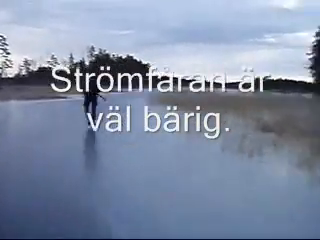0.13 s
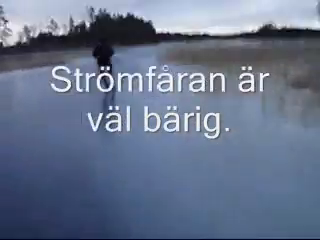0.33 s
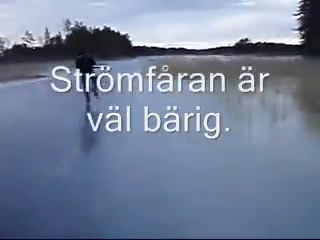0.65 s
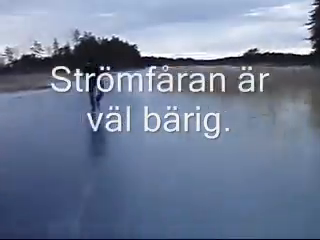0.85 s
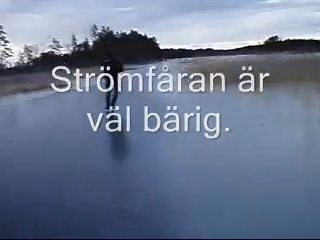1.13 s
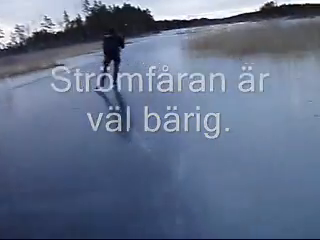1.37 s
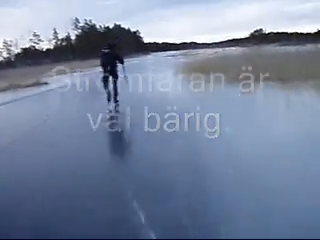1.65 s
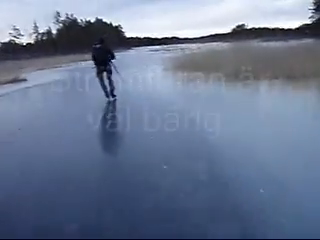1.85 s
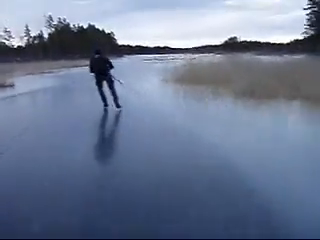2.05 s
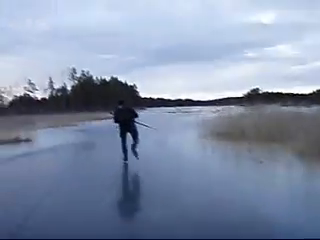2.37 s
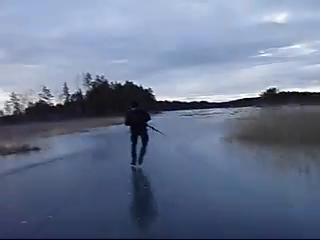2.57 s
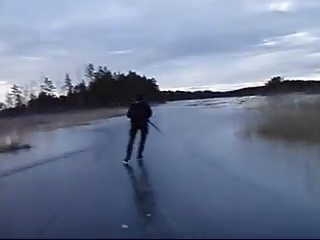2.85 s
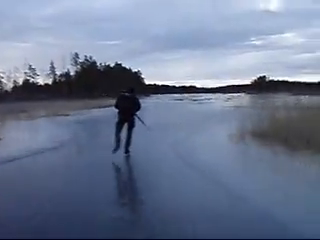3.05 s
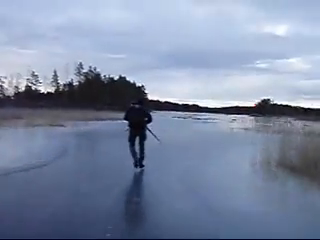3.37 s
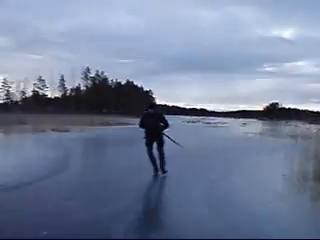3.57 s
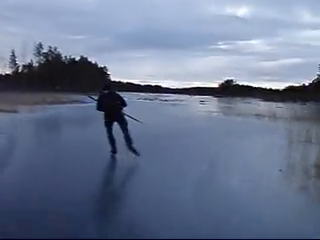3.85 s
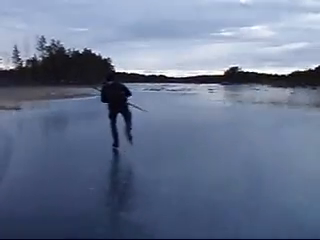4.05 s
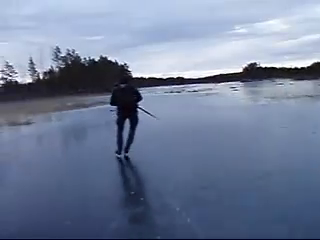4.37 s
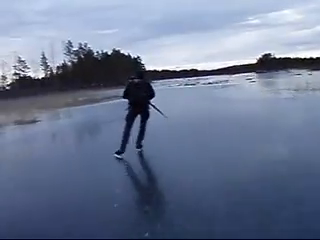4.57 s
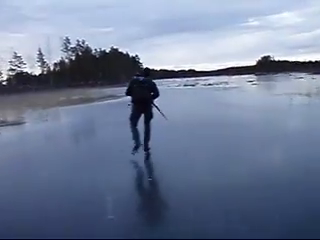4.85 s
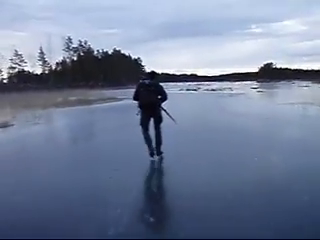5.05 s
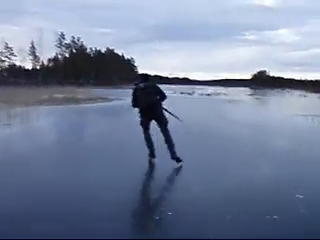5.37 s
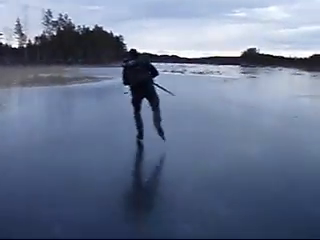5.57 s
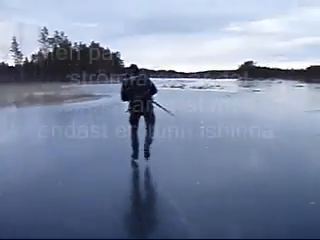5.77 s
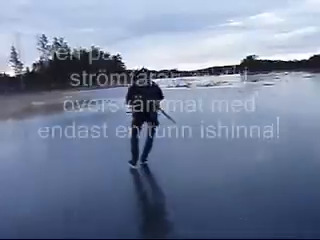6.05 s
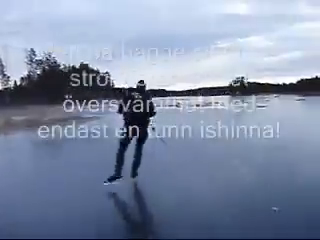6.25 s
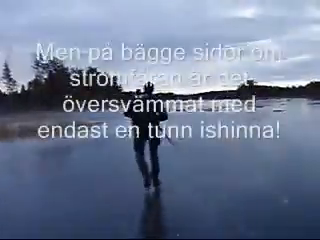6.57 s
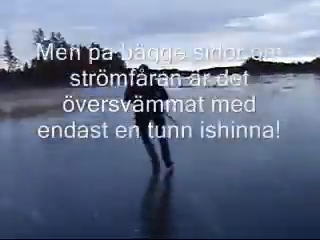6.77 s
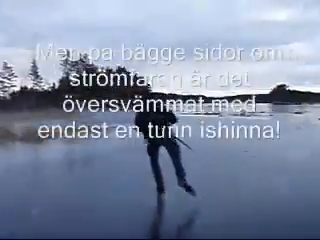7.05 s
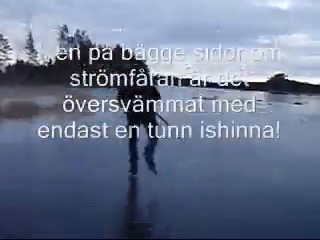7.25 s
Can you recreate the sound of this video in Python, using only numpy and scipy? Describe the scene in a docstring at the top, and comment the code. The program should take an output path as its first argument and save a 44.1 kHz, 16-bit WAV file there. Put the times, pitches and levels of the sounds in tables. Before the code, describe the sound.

Long skate blades hiss and scrape over lake ice in steady strokes, with clacks, crackling chips and short chirping knocks.

```python
"""Long skates on clear lake ice

Out on the open ice, heard from a camera carried by the skater behind. The blades hiss as they glide,
swell at each push-off and sing faintly; one that is set down clacks and crunches, falling in pitch
as it takes the weight. Chips snap off the edge and bumps send short bending-wave chirps through
the ice. Air rumbles faintly on the microphone, which overloads on the peaks."""
import sys
import numpy as np
from scipy import signal
from scipy.fft import rfft, irfft
from scipy.io import wavfile

SR = 44100
rng = np.random.default_rng(int(sys.argv[2]) if len(sys.argv) > 2 else 0)


def digitize_waveform(pressure):
    """Quantize a signal to 16-bit integers and store it at the path in sys.argv[1].

    Rows of a 2-D input are taken as channels; values are limited to [-1, 1].
    """
    field = np.atleast_2d(pressure).T
    bounded = np.clip(field, -1, 1)
    quanta = np.round(bounded * 32767).astype(np.int16)
    wavfile.write(sys.argv[1], SR, quanta)


N = 326823
TIME = np.arange(0, N + 32, 32) / SR  # coarse clock for the envelopes, in seconds


def from_db(db):
    """Decibels to gain."""
    return 10 ** (np.asarray(db) / 20)


def rms_one(x):
    """Scale to an rms of 1."""
    return x / np.sqrt(np.mean(x ** 2) + 1e-20)


def drift(rate):
    """Smooth random wander with about `rate` turns a second; rms 1."""
    step, settle = 40, 2000
    pole = np.exp(-2 * np.pi * rate * step / SR)
    noise = rng.standard_normal(N // step + settle + 2)
    slow = signal.lfilter([1], [1, -2 * pole, pole * pole], noise)[settle:]
    return np.interp(np.arange(N) / step, np.arange(len(slow)), rms_one(slow))


def coloured(x, colour, size=4096):
    """Minimum-phase filter with a spectrum given as (Hz, dB) points; rms 1."""
    hz, db = np.transpose(colour)
    bins_hz = np.linspace(1, SR / 2, size // 2 + 1)
    log_gain = np.log(from_db(np.interp(np.log(bins_hz), np.log(hz), db)))
    cepstrum = irfft(log_gain)[:size // 2]
    causal = np.r_[cepstrum[0], 2 * cepstrum[1:]]
    response = irfft(np.exp(rfft(causal, size)))
    return rms_one(signal.fftconvolve(x, response)[:N])


def resonate(x, hz, width_hz):
    """A steady resonance with gain 1 at its peak."""
    r = np.exp(-np.pi * width_hz / SR)
    feedback = [1, -2 * r * np.cos(2 * np.pi * hz / SR), r * r]
    return signal.lfilter(np.array([1, 0, -1]) * (1 - r * r) / 2, feedback, x)


def sweep(x, hz, width_hz):
    """A resonance whose centre follows the curve hz."""
    turn = np.exp(2j * np.pi * np.cumsum(hz) / SR)
    r = np.exp(-np.pi * width_hz / SR)
    return (signal.lfilter([1 - r], [1, -r], x / turn) * turn).real


def add(track, s, sound):
    """Mix a short sound into a track at time s."""
    start = int(np.clip(s * SR, 0, N - 1))
    track[start:start + len(sound)] += sound[:N - start]


def swell(s, rise_s, fall_s):
    """A rounded peak at time s with exponential flanks."""
    from_peak = (TIME - s) / np.where(TIME < s, rise_s, fall_s)
    return 1 / np.cosh(np.clip(from_peak * np.pi / 2, -40, 40))


def held(s, length_s, attack_s, release_s, fade_db_per_s=0):
    """Attack, a hold that may fade, release."""
    age = np.maximum(TIME - s, 0)
    release = np.exp(-np.maximum(age - length_s, 0) / release_s)
    return np.minimum(age / attack_s, 1) * from_db(-fade_db_per_s * age) * release


def together(envelopes):
    """Add coarse envelopes in power and spread the sum over the samples."""
    power = sum(envelope ** 2 for envelope in envelopes)
    return np.interp(np.arange(N) / SR, TIME, np.sqrt(power + 1e-18))


def fractures(per_s, spread_db, decay_s):
    """Envelope of tiny fractures: random starts, uneven sizes, each dying fast; rms 1."""
    sizes = from_db(spread_db * np.minimum(rng.exponential(1, N), 3))
    born = rng.random(N) < per_s / SR
    power = signal.lfilter([1], [1, -np.exp(-2 / (decay_s * SR))], born * sizes ** 2 + 1e-18)
    return rms_one(np.sqrt(power))


def gritty(grain_db):
    """Noise whose strength jumps from one ice grain to the next."""
    return rms_one(rng.standard_normal(N) * from_db(grain_db * drift(500)))


def through_blade(x, trip_s=0.00172, wander=0.055, reflected=0.33):
    """The steel sheds the lows and echoes twice; a shifting contact moves the squeaky overtones."""
    highs = signal.sosfilt(signal.butter(4, 980, "high", fs=SR, output="sos"), x)
    now = np.arange(N)
    earlier = now - trip_s * SR * (1 + wander * drift(11))
    once = np.interp(earlier, now, highs)
    twice = np.interp(earlier, now, once)
    return rms_one(highs + reflected * once + reflected ** 2 * twice)


# Strokes ahead of the microphone. Each row: start in seconds, level in dB, length in seconds.
GLIDES = [(0.043, -21.5, 0.19), (0.572, -27, 0.12), (1.976, -30, 0.23), (2.536, -26.5, 0.15),
          (3.082, -27.5, 0.14), (3.497, -19.5, 0.18), (3.791, -19.5, 0.13), (5.048, -24, 0.55),
          (6.216, -25.5, 0.22), (6.703, -25.5, 0.54)]
# The unbroken hiss under the strokes. Each row: time in seconds, relative level in dB.
COASTING = [(0.0, -28), (0.45, -27.5), (0.7, -28.5), (1.24, -31), (1.8, -27), (2.16, -25), (2.37, -27),
            (3.51, -28), (3.73, -26), (4.19, -28), (5.03, -26), (5.39, -21), (5.78, -31), (6.55, -25.5),
            (6.685, -31.5), (6.74, -26), (7.02, -19), (7.41, -34)]


def gliding():
    """Envelope of blade friction: it rises as a skate is set down and fades through the stroke."""
    strokes = [from_db(db) * held(s, length, attack_s=0.026, release_s=0.047, fade_db_per_s=11.5)
               for s, db, length in GLIDES]
    coasting = from_db(np.interp(TIME, *np.transpose(COASTING)) - 2)
    return together(strokes + [coasting])


# Tone of a gliding and of a pushing edge. Each row: frequency in Hz, relative level in dB.
GLIDE_COLOUR = [(150, -5.5), (400, -4.5), (800, -8.5), (1500, -5.5), (2500, -3.5), (3300, -0.5),
                (4500, -1.5), (5600, -10.5), (7000, -17.5), (9500, -18), (12000, -12)]
PUSH_COLOUR = [(200, -14), (800, -12), (1500, -21), (2100, -3.5), (2500, -9), (3100, 1), (4000, -0.5),
               (4900, -3), (5700, -16.5), (7000, -18), (9500, -19.5), (12000, -11)]
# Brief skids of the edge. Each row: start in seconds, level in dB, length in seconds.
SKIDS = [(0.164, -19, 0.025), (0.269, -25, 0.035), (0.346, -21.5, 0.018), (0.511, -18.5, 0.041),
         (0.711, -27, 0.052), (0.922, -22, 0.05), (1.88, -24, .07), (3.3, -20, 0.012), (4.014, -19, 0.029),
         (4.544, -22, 0.023), (5.212, -11, 0.021), (5.678, -22, 0.013), (6.477, -20.5, 0.05),
         (6.57, -25.5, 0.058), (6.701, -12.5, 0.017), (6.832, -17, .02), (6.921, -18, 0.046),
         (7.369, -22, 0.048)]
# The skater ahead pushes off, a strong foot and a weak foot in turn.
# Each row: time of the peak in seconds, level in dB, rise and fall in seconds.
PUSHES = [(0.592, -13.5, 0.016, 0.02), (1.495, -13.5, 0.037, 0.045), (2.23, -22, 0.062, 0.034),
          (3.002, -10, 0.027, 0.058), (3.91, -15.5, 0.025, 0.016), (4.72, -9.5, 0.054, 0.045),
          (5.42, -19, 0.042, 0.11), (6.315, -8, 0.053, 0.062), (7.055, -12, 0.047, 0.084)]


def edge_hiss(friction):
    """A gliding edge crackles; under pressure it shaves the ice in a denser, narrower hiss."""
    pushing = together(from_db(db) * swell(s, rise, fall) for s, db, rise, fall in PUSHES)
    skidding = together(from_db(db) * held(s, length, attack_s=0.0062, release_s=0.0092)
                        for s, db, length in SKIDS)
    level = np.sqrt(friction ** 2 + skidding ** 2 + pushing ** 2)
    shaving = 1 / (1 + (from_db(-19) / level) ** 5.8)  # share of the narrow hiss
    crackle = np.hypot(0.8, fractures(per_s=120, spread_db=2.5, decay_s=0.0026))
    glide = from_db(1.27) * coloured(gritty(grain_db=1) * crackle, GLIDE_COLOUR)
    push = from_db(-0.67) * coloured(gritty(grain_db=3) * from_db(1.7 * drift(150)), PUSH_COLOUR)
    return level * (np.sqrt(1 - shaving) * glide + np.sqrt(shaving) * push)


# A blade takes weight and bites into the lake's surface.
# Each row: start in seconds, level in dB, length in seconds, starting pitch in Hz.
BITES = [(0.0, -22.5, 0.15, 1830), (0.112, -20.5, 0.018, 1300), (0.216, -18, 0.014, 2100),
         (0.522, -25.5, 0.015, 1540), (0.921, -19.5, 0.049, 1560), (1.056, -19.5, 0.021, 1910),
         (1.754, -21, 0.025, 1680), (1.823, -16.5, 0.011, 1260), (1.935, -17.5, 0.027, 1820),
         (2.567, -19.5, 0.068, 1650), (2.721, -25, 0.059, 1670), (3.486, -23, 0.15, 1660),
         (3.795, -20.5, 0.15, 1640), (4.035, -20, 0.015, 1350), (4.367, -18, 0.041, 1810),
         (4.539, -19, 0.032, 1510), (4.648, -30.5, 0.13, 1200), (4.877, -33, 0.063, 1200),
         (5.308, -23.5, 0.059, 1950), (5.396, -18.5, 0.043, 1900), (5.484, -27.5, 0.1, 1680),
         (6.347, -21, 0.081, 1920), (6.704, -28, 0.041, 2400), (6.902, -22, 0.07, 1810),
         (7.052, -18.5, 0.09, 1890), (7.329, -22.5, 0.086, 1790)]


def crushing(friction, sag_octaves_per_s=6, loaded_hz=1140, grind_hz=1410):
    """Strength and pitch of the crunch: the strongest contact leads, sinking as the weight comes on."""
    bites = [from_db(db) * held(s, length, attack_s=0.004, release_s=0.012, fade_db_per_s=34)
             for s, db, length, _ in BITES]
    pitches = [np.maximum(hz * 2 ** (-sag_octaves_per_s * np.maximum(TIME - s, 0)), loaded_hz)
               for s, _, _, hz in BITES]
    grind = from_db(-9) * friction  # light crushing under a gliding blade
    strength = np.hypot(together(bites), grind)
    weighted_pitch = together(bite * hz for bite, hz in zip(bites, pitches))
    return strength, np.hypot(weighted_pitch, grind * grind_hz) / strength


# Tone of crushed ice. Each row: frequency in Hz, relative level in dB.
CRUNCH_COLOUR = [(120, -6), (350, 4), (750, -1.5), (1150, 0.5), (2300, -1), (2800, -3.5), (4200, -14.5),
                 (5200, -8.5), (6400, -8), (7400, -24.5), (10000, -11.5), (12000, -18.5)]


def crunch(strength, centre_hz):
    """The surface gives way in fine slips: a thin pitched rasp at first, more body once loaded."""
    slips = np.hypot(0.3, fractures(per_s=220, spread_db=2.5, decay_s=0.0024))
    crushed = coloured(gritty(grain_db=0.7) * slips, CRUNCH_COLOUR)
    thin = through_blade(crushed)
    loaded = np.clip((1650 - centre_hz) / 400, 0.1, 1)
    body = signal.sosfilt(signal.butter(4, 1000, fs=SR, output="sos"), crushed) * loaded
    rasp = rms_one(sweep(thin, centre_hz * (1 + 0.1 * drift(28)), width_hz=96))
    return strength * (from_db(-2) * thin + from_db(3) * body + from_db(-5) * rasp)


# Tone of air right on the microphone. Each row: frequency in Hz, relative level in dB.
WIND_COLOUR = [(20, -34), (45, 0), (80, -5), (150, 0.5), (300, -8), (700, -43), (2000, -35)]
# Gusts on the microphone. Each row: start in seconds, level in dB, length in seconds.
GUSTS = [(2.071, -24.5, .08), (2.31, -33, 0.064)]


def wind(start_db=-39.5, end_db=-43):
    """Carried through the air, the microphone picks up a lumpy rumble that eases along the way."""
    steady = from_db(np.linspace(start_db, end_db, len(TIME)))
    gusts = [from_db(db) * held(s, length, attack_s=0.012, release_s=0.033) for s, db, length in GUSTS]
    lumps = from_db(4 * drift(8.8))
    return together(gusts + [steady]) * lumps * coloured(rng.standard_normal(N), WIND_COLOUR)


def ice_chirp(hz, rebound_s, octaves, rebound_db, delay_cycles=0.749, size=1024):
    """High bending waves outrun low ones, so a blow arrives as a falling chirp with a duller rebound."""
    f = np.linspace(1, SR / 2, size // 2 + 1)
    band = 1 / np.sqrt(1 + (np.log2(f / hz) / octaves) ** 6)
    dispersion = np.exp(-4j * np.pi * delay_cycles * np.sqrt(f / hz))
    rebound = from_db(rebound_db) * np.exp(-2j * np.pi * f * rebound_s) / (1 + 1j * f / hz)
    wave = irfft(band * dispersion * (1 + rebound))
    return wave / np.abs(wave).max()


def plop(pitch, middle_hz=322, spread_octaves=0.78):
    """A shallow bump bends the ice without jarring the skate: a round, low chirp; pitch runs 0-1."""
    hz = middle_hz * 2 ** (spread_octaves * (pitch - 0.5))
    return ice_chirp(hz, rebound_s=0.0026, octaves=0.71, rebound_db=-11.5)


# Shallow bumps in the lake ice. Each row: start in seconds, relative peak level in dB.
PLOPS = [(0.299, -15), (0.377, -17), (1.173, -12), (1.55, -17), (1.842, -13), (1.887, -13), (2.011, -15),
         (2.65, -11.5), (2.795, -17.5), (3.14, -13.5), (3.565, -9.5), (4.259, -14.5), (4.826, -7.5),
         (5.13, -14), (5.647, -17), (5.866, -12), (6.024, -12), (6.525, -6), (6.735, -18), (6.769, -16),
         (6.828, -13), (7.213, -15), (7.238, -16.5), (7.259, -16), (7.283, -15.5)]


def ripples(strength, patter_count=110):
    """Uneven ice under the blades: clear plops over a steady soft patter, stronger under load."""
    out = np.zeros(N)
    for (s, db), pitch in zip(PLOPS, rng.random(len(PLOPS))):
        add(out, s, from_db(db - 1.1) * plop(pitch))
    load = np.maximum(strength / from_db(-30), 1)
    for slot, (offset, size, pitch) in enumerate(rng.random((patter_count, 3))):
        at = int((slot + offset) / patter_count * N)
        add(out, at / SR, from_db(-31 + 5.2 * size ** 2) * load[at] ** 0.12 * plop(pitch))
    return out


# A blade sings on its edge. Each row: start in seconds, level in dB, length in seconds.
SONGS = [(0.08, -39, 0.31), (2.106, -40, 0.32), (5.096, -37, 0.2), (6.697, -29.5, .18)]


def blade_song(hz=1135, width_hz=66, floor_db=-51.5):
    """Friction keeps one narrow mode of the steel ringing, now and then more strongly."""
    songs = [from_db(db) * held(s, length, attack_s=0.015, release_s=0.02) for s, db, length in SONGS]
    mode = resonate(resonate(rng.standard_normal(N), hz, width_hz), hz, width_hz)
    return together(songs + [from_db(floor_db)]) * rms_one(mode)


# Hard bumps in the skater's path. Each row: start in seconds, relative level in dB,
# nominal pitch in Hz (the chirp is centred lower).
KNOCKS = [(0.092, -21, 1020), (0.12, -18, 550), (0.174, 0, 990), (1.826, -12, 1260), (1.86, -9, 1030),
          (1.923, -4, 1120), (2.675, -15, 670), (2.706, -13, 443), (2.845, -11, 900), (3.183, -5, 716),
          (3.206, -12, 655), (3.699, -14, 745), (3.724, -14, 1240), (3.737, -3, 960), (3.776, -4, 1260),
          (3.878, -6.5, 1030), (3.948, -9.5, 714), (3.981, -12.5, 535), (4.027, -18, 800),
          (4.095, -6.5, 920), (4.22, -16, 686), (4.309, -12.5, 730), (4.415, -11, 806), (4.4751, -1.5, 770),
          (4.526, -7.5, 784), (4.565, -7, 630), (4.631, -3, 770), (4.673, -6.5, 610), (4.738, -8, 830),
          (4.774, -12, 656), (4.793, -14.5, 860), (4.871, -9.5, 1080), (4.891, -8.5, 1100),
          (4.921, -15, 960), (4.952, -7, 800), (5.016, -17.5, 874), (5.054, -9, 730), (5.097, -3, 665),
          (5.469, 1, 1070), (5.694, -16, 615), (5.736, -11.5, 850), (5.821, -16, 820), (5.844, -8, 1080),
          (5.893, -20, 660), (5.935, -15.5, 690), (5.998, -17, 680), (6.157, -19.5, 525), (6.238, -16, 725),
          (6.49, -12, 590), (7.121, -11.5, 750)]


def knocks():
    """A blade strikes a bump: the ice chirps, the skate comes down again and the binding rattles."""
    chirps, rattle = np.zeros(N), np.zeros(N)
    t = np.arange(int(0.03 * SR)) / SR
    for (s, db, hz), late in zip(KNOCKS, rng.random(len(KNOCKS))):
        octaves = max(1.77 + 0.17 * db, 0.5)  # half bandwidth: softer bumps are rounder
        chirp = ice_chirp(0.73 * hz, rebound_s=0.00179 + 0.0014 * late, octaves=octaves, rebound_db=-6.5)
        add(chirps, s, from_db(db + 7.5) * chirp)
        add(rattle, s, from_db(db - 0.5) * np.exp(-t / 0.0027))
    skate_ring = from_db(-5.5) * resonate(chirps, hz=1240, width_hz=170)
    skate_ring += from_db(-10) * resonate(chirps, hz=890, width_hz=220)
    low_middle = from_db(-11.5) * resonate(chirps, hz=610, width_hz=260)  # cut for a dry knock
    return chirps + skate_ring - low_middle + rattle * coloured(rng.standard_normal(N), CRUNCH_COLOUR)


# Ice chips snap off at the edge. Each row: time in seconds, relative tick and crunch levels in dB.
CHIPS = [(0.095, -1.5, -13), (0.221, -11, -23), (0.463, 6, -17), (0.499, -17, -21), (0.654, -7, -19),
         (0.731, -10, -29), (0.738, -4.5, -38), (0.884, -3, -12), (1.351, -13.5, -25), (1.739, -6.5, -11),
         (1.826, -16, -9.5), (1.842, -7.5, -12), (1.921, -30, -9), (1.998, -9, -21), (2.007, -7.5, -18.5),
         (2.075, 0.5, -26), (2.091, -11, -27), (2.1, -6, -16), (2.357, -12.5, -22), (3.513, -6, -10.5),
         (3.604, 1.5, -21), (3.7227, -22, -10), (3.742, -3.5, -9), (3.773, -6, -8), (3.779, 3, -10),
         (3.833, -19, -7.5), (3.947, 5.5, -10), (3.98, -23, -13), (4.055, -21, -11.5), (4.077, -12.5, -22),
         (4.095, -16, -17), (4.241, -12, -15), (4.258, -13, -15.5), (4.287, -13, -16), (4.478, -6, -25),
         (4.526, -4, -17), (4.63, -9, -13), (4.873, -2.5, -9), (4.896, -7, -10), (4.9, -4, -14),
         (4.953, -8, -16), (5.054, -5.5, -7), (5.084, -9, -17), (5.204, -9, -18), (5.271, -2.5, -12.5),
         (5.298, -12, -20), (5.339, -2.5, -9), (5.396, -4, -25), (5.422, 3, -10), (5.472, -3.5, -17),
         (5.544, -12, -21), (5.633, -4.5, -17), (5.737, -15, -15), (5.847, -20, -16.5), (6.024, -12, -16),
         (6.143, -5.5, -19), (6.193, -10.5, -19), (6.6972, -10, -13), (6.716, -9, -22), (6.76, -12, -17),
         (6.804, -10, -17), (6.814, -6, -16), (6.832, -7.5, -17), (6.88, -21, -18), (6.93, -8, -12),
         (6.961, -1, -4.5), (7.251, -14, -23), (7.305, -6, -16.5), (7.325, -13, -18), (7.362, -10.5, -16)]


def chips(attack_s=0.00058, tear_s=0.0036, chatter_hz=3975, wander=0.064):
    """A chip tears off in milliseconds: the edge chatters in a metallic tick, over a little crunch."""
    tick_level, crunch_level = np.zeros(N), np.zeros(N)
    t = np.arange(int(4 * tear_s * SR)) / SR
    burst = np.minimum(t / attack_s, 1) * np.exp(-(t / tear_s) ** 2)
    for s, tick_db, crunch_db in CHIPS:
        add(tick_level, s - attack_s, from_db(tick_db) * burst)
        add(crunch_level, s - attack_s, from_db(crunch_db) * burst)
    phase = 2 * np.pi * np.cumsum(chatter_hz * (1 + wander * drift(300))) / SR
    chatter = rms_one(np.sin(phase) + from_db(-19) * np.sin(2 * phase))
    tick = rms_one(chatter + from_db(1) * coloured(gritty(grain_db=3), PUSH_COLOUR))
    crushed = through_blade(coloured(gritty(grain_db=0.5), CRUNCH_COLOUR))
    return from_db(-6) * tick_level * tick + from_db(1.1) * crunch_level * crushed


# Modes of the struck steel. Each row: frequency in Hz, level in dB, seconds to die away by 60 dB.
BLADE_MODES = [(1200, -3.5, 0.017), (1730, -4.5, 0.0095), (2330, -5.5, .012), (4050, 7, 0.011)]
# Blades land ahead of the microphone. Each row: start in seconds, level in dB, contact pitch in Hz.
CLACKS = [(0.132, -2, 1300), (0.54, -5, 2100), (0.908, -8, 2200), (0.9189, 0, 1750), (1.056, -9, 1600),
          (1.083, -7, 1760), (2.536, -4, 1150), (2.563, 1.5, 1720), (2.592, -9, 1600), (2.652, -4.5, 1310),
          (2.815, -12, 1190), (3.485, -3.5, 1650), (3.498, -6, 1520), (4.3393, -0.5, 1710),
          (4.3624, 0.5, 1600), (4.379, -0.5, 1970), (4.399, -9, 1300), (4.65, -6, 1100), (4.9139, 0, 1390),
          (4.937, -7, 1500), (5.315, -4.5, 1800), (5.349, -4.5, 1780), (6.6965, -8, 2400),
          (7.074, -5, 1400), (7.348, -10, 1820)]


def clacks(falloff_db_per_octave=18, detune=0.065, grit_db=-9.5, grit_s=0.0049):
    """A blade slaps the ice and rings, favouring modes near the pitch of the contact; grit follows."""
    steel, grit = np.zeros(N), np.zeros(N)
    t = np.arange(int(0.04 * SR)) / SR
    hz, mode_db, t60 = np.transpose(BLADE_MODES)
    decays = from_db(-60 * t / t60[:, None])
    signs = (-1) ** np.arange(len(hz))
    for s, db, contact_hz in CLACKS:
        level_scatter, pitch_scatter = rng.standard_normal((2, len(hz)))
        octaves_away = np.abs(np.log2(hz / contact_hz))
        gains = from_db(mode_db - falloff_db_per_octave * octaves_away + 2 * level_scatter)
        rings = np.sin(2 * np.pi * np.outer(hz * (1 + detune * pitch_scatter), t)) * decays
        wave = (gains * signs) @ rings
        add(steel, s, from_db(db) * wave / np.abs(wave).max())
        add(grit, s, from_db(db + grit_db) * np.exp(-t / grit_s))
    ringing = signal.sosfilt(signal.butter(2, 800, "high", fs=SR, output="sos"), steel)
    return ringing + grit * through_blade(coloured(rng.standard_normal(N), CRUNCH_COLOUR))


def scene():
    """Open ice gives no echo: everything reaches the one microphone dry."""
    friction = gliding()
    strength, centre_hz = crushing(friction)
    sliding = edge_hiss(friction) + crunch(strength, centre_hz) + blade_song()
    impacts = chips() + clacks() + knocks() + ripples(strength)
    return (sliding + impacts + wind())[None]


# Resonances of the camera's microphone opening. Each row: frequency in Hz, width in Hz, lift in dB.
MIC_RESONANCES = [(3813, 176, 6), (4200, 170, 5.5), (7890, 960, 4.5), (11700, 380, 8)]


def record(dry, cutoff_hz=12250):
    """At the camera: the microphone opening rings, peaks overload and the top treble is cut."""
    ringing = sum((from_db(db) - 1) * resonate(dry, hz, width) for hz, width, db in MIC_RESONANCES)
    lowpass = signal.ellip(10, 0.2, 70, cutoff_hz, fs=SR, output="sos")
    band = signal.sosfilt(lowpass, dry + ringing)
    overloaded = band / (1 + band ** 8) ** (1 / 8)
    return signal.sosfilt(lowpass, overloaded)


dry = scene()
out = record(dry)
digitize_waveform(out)
```